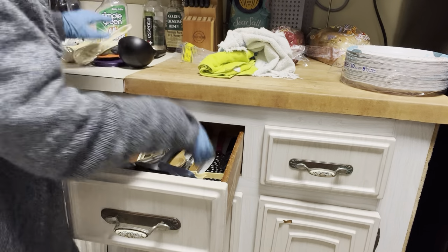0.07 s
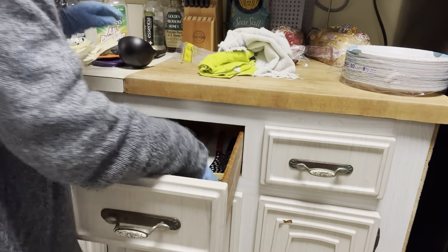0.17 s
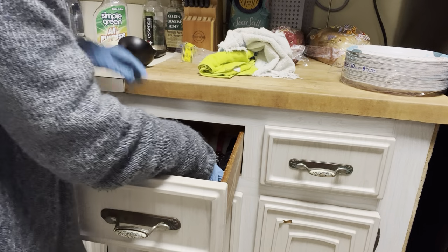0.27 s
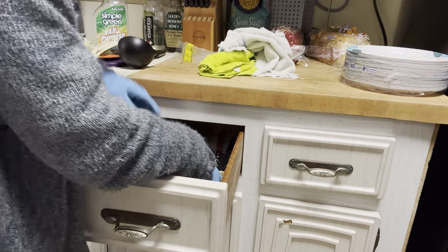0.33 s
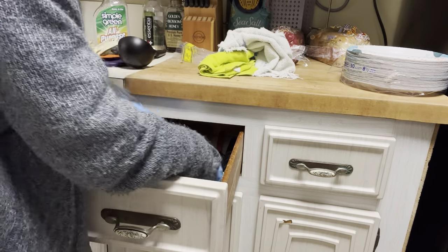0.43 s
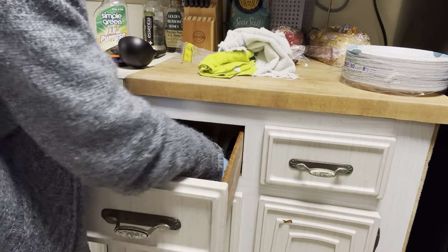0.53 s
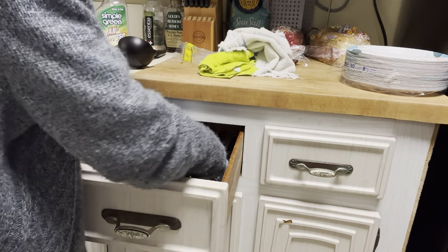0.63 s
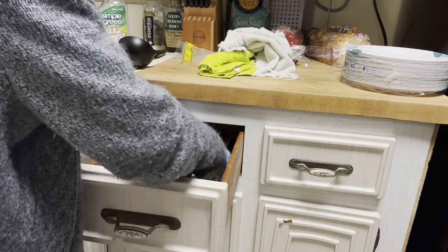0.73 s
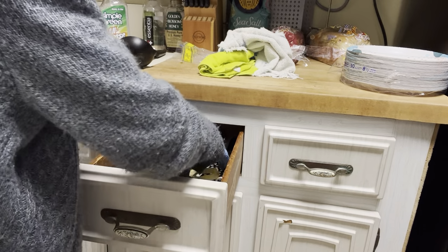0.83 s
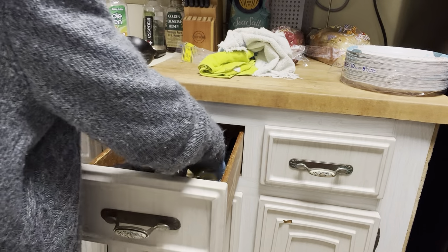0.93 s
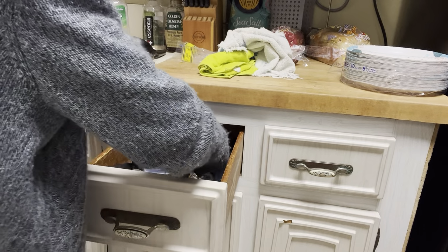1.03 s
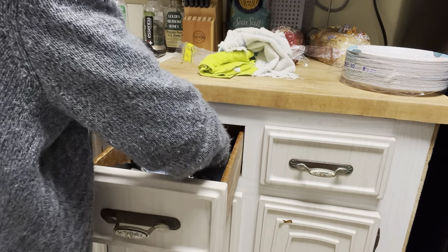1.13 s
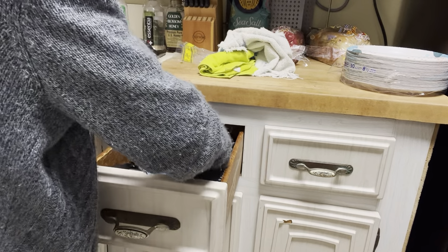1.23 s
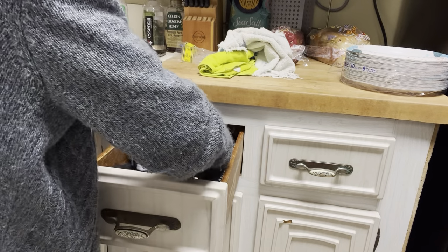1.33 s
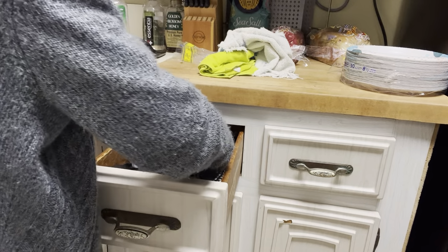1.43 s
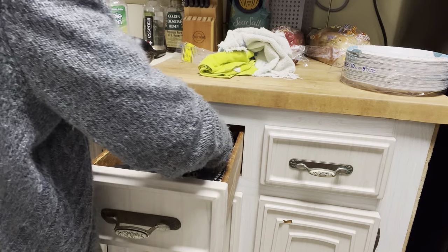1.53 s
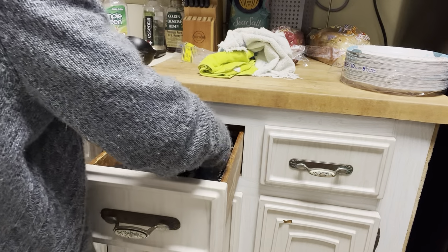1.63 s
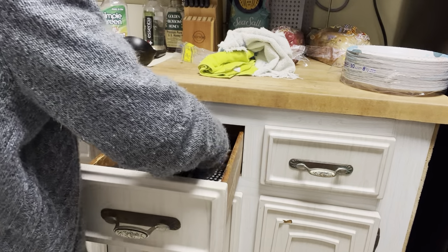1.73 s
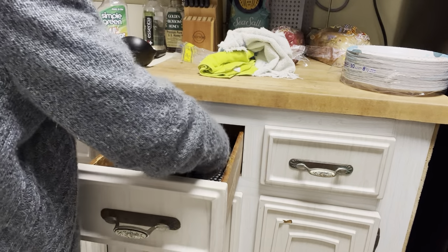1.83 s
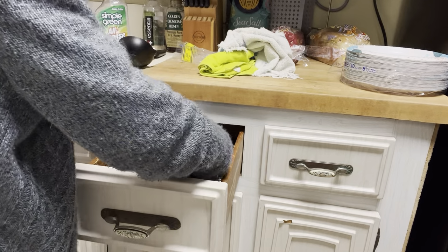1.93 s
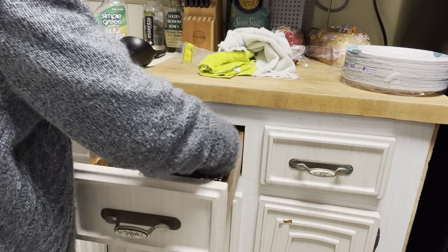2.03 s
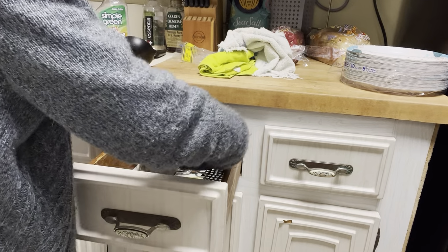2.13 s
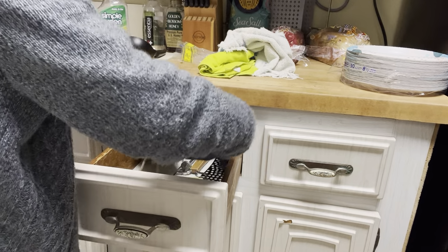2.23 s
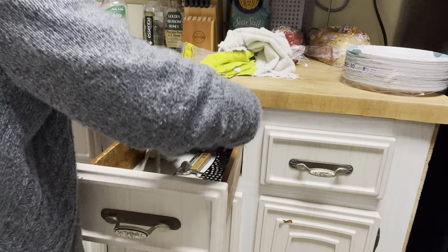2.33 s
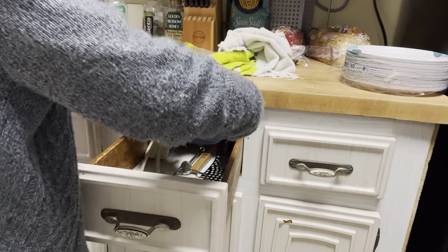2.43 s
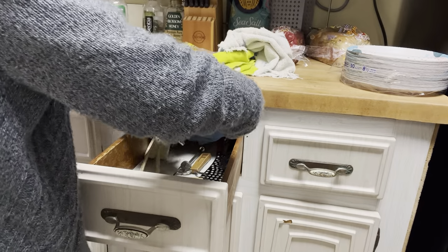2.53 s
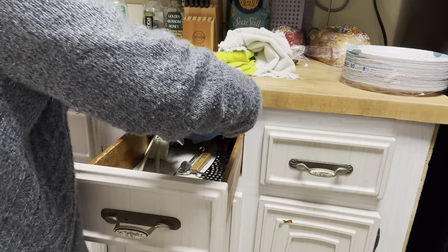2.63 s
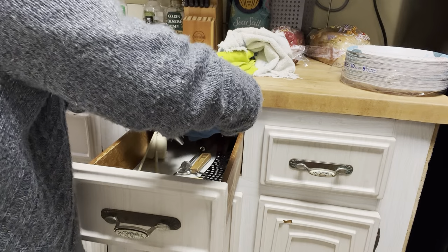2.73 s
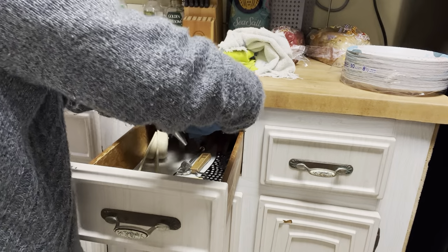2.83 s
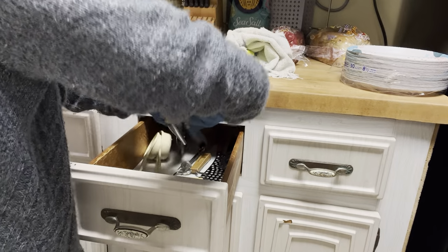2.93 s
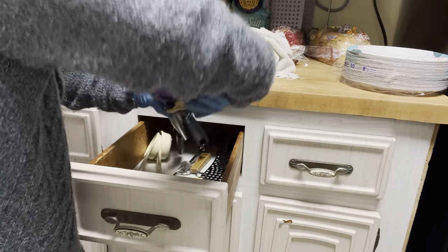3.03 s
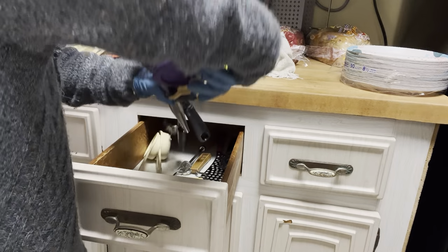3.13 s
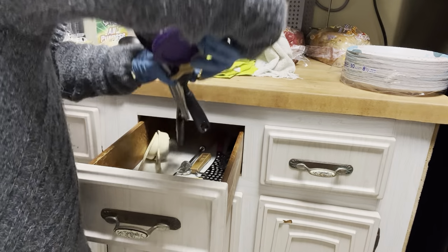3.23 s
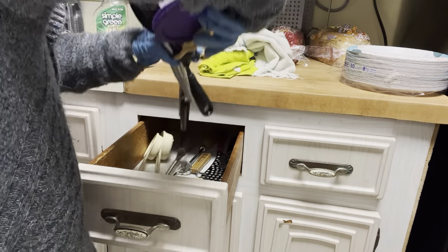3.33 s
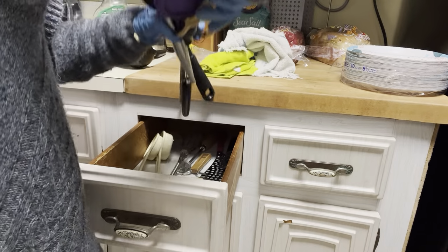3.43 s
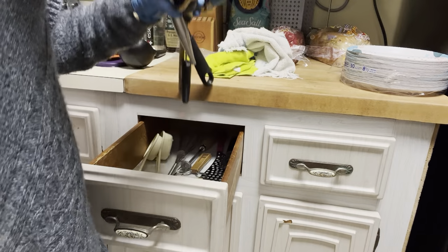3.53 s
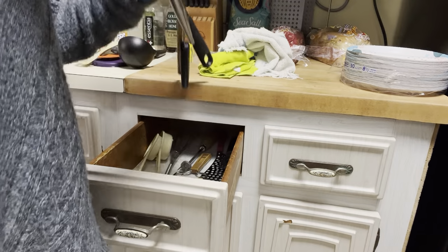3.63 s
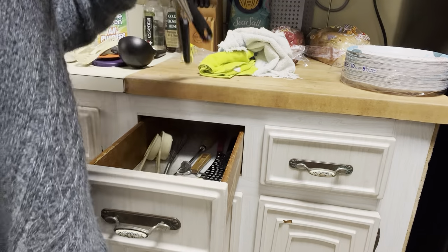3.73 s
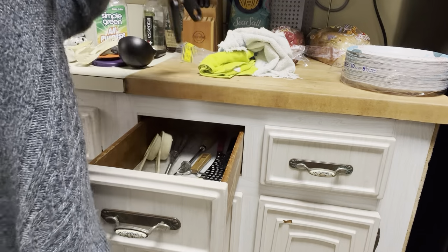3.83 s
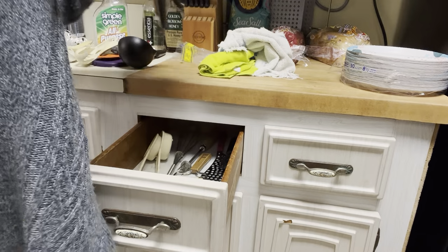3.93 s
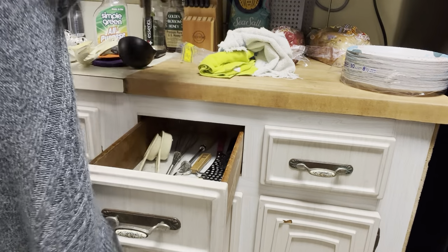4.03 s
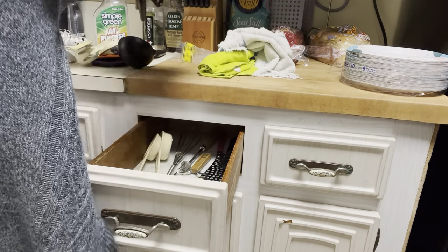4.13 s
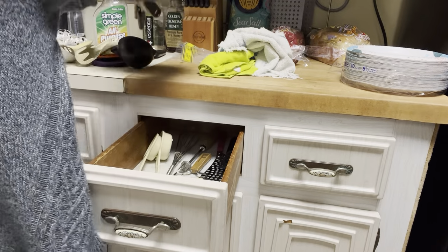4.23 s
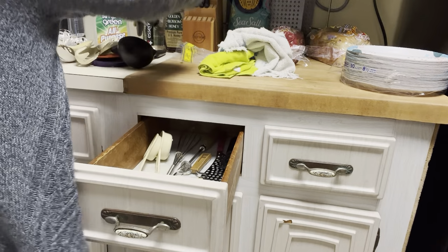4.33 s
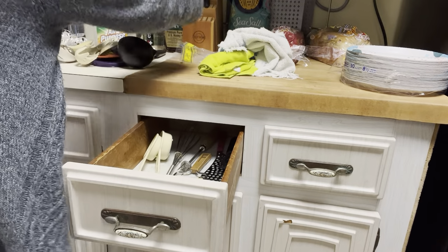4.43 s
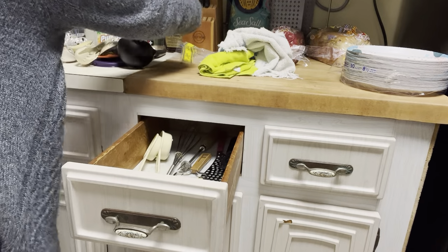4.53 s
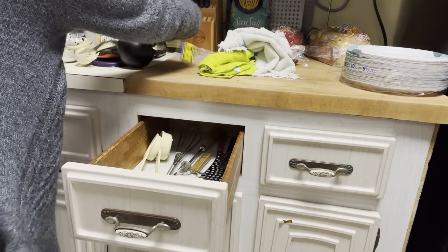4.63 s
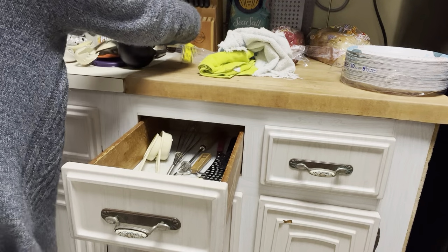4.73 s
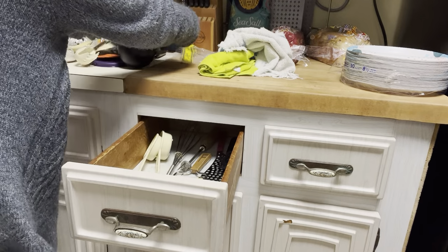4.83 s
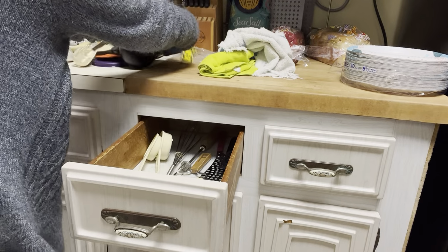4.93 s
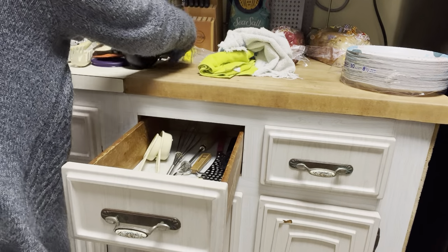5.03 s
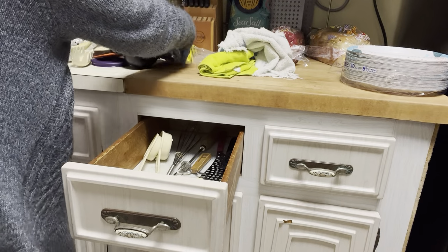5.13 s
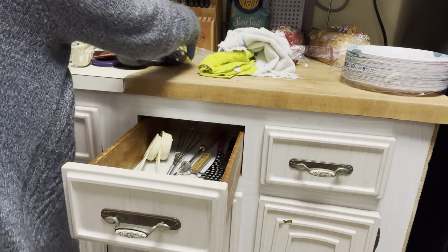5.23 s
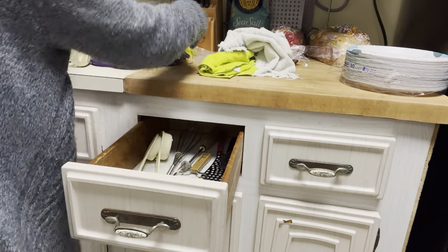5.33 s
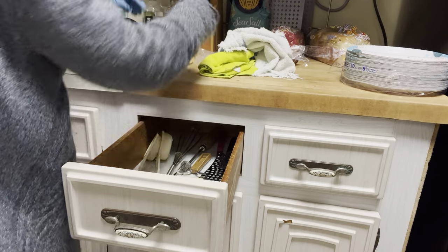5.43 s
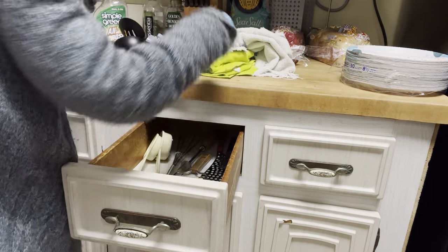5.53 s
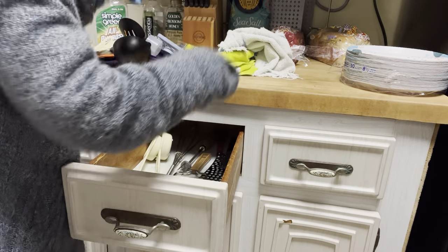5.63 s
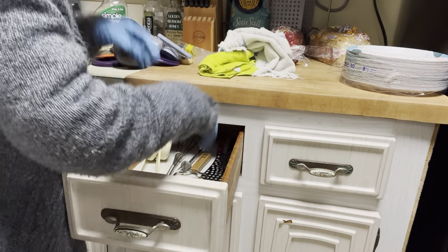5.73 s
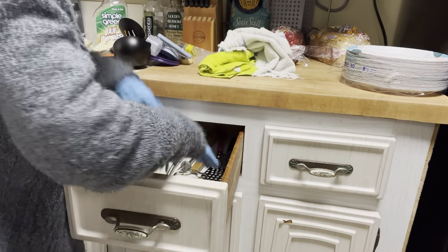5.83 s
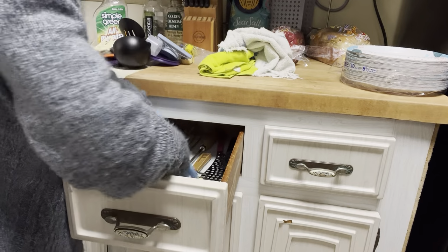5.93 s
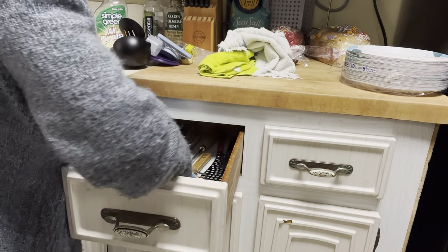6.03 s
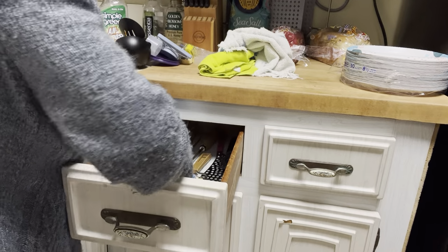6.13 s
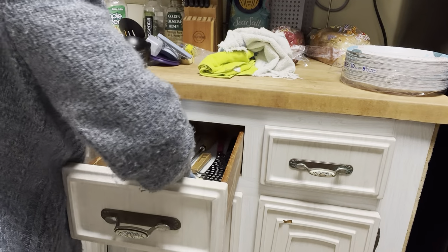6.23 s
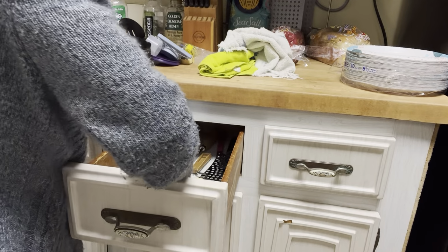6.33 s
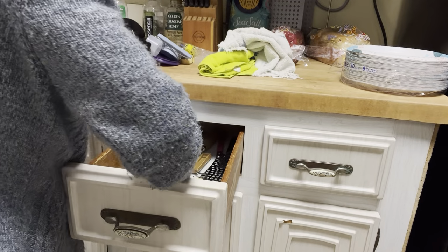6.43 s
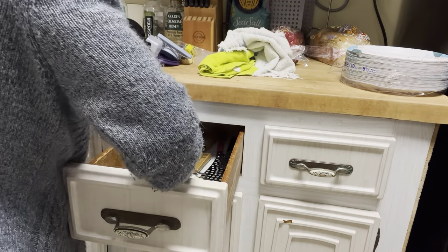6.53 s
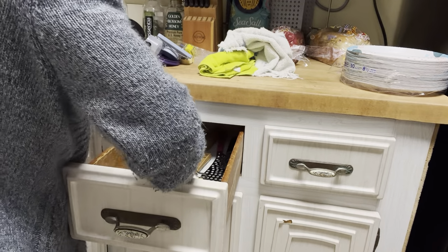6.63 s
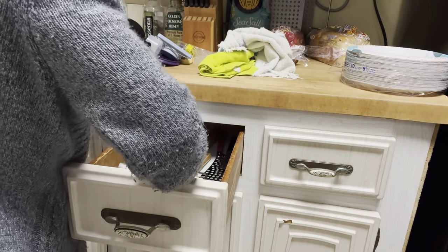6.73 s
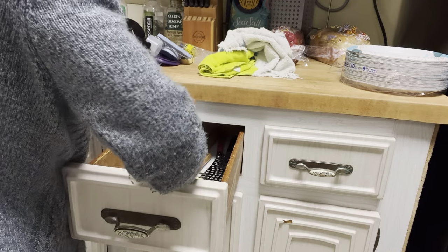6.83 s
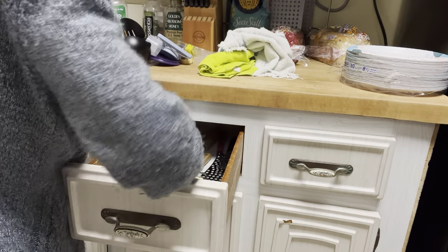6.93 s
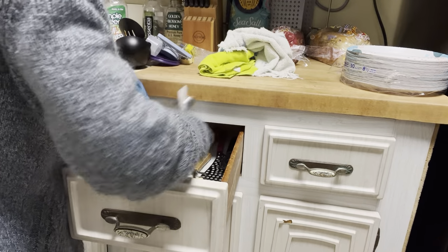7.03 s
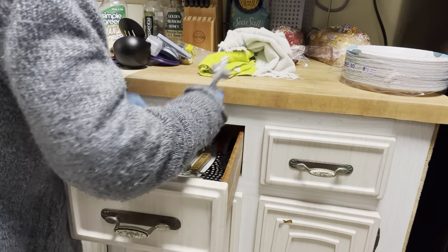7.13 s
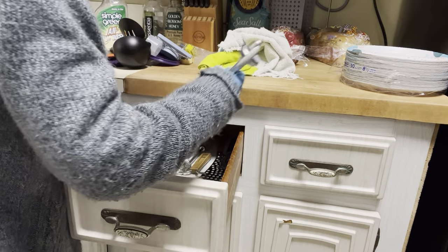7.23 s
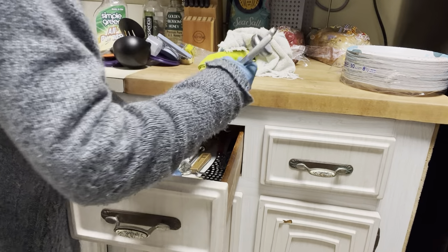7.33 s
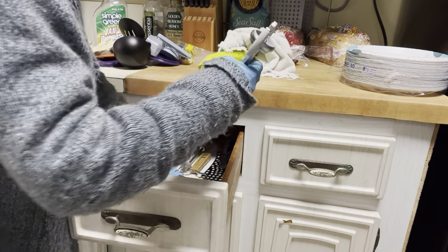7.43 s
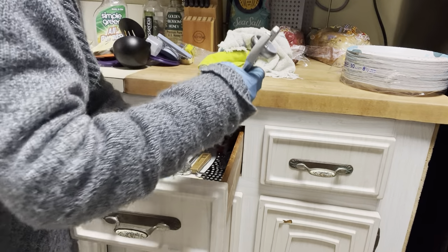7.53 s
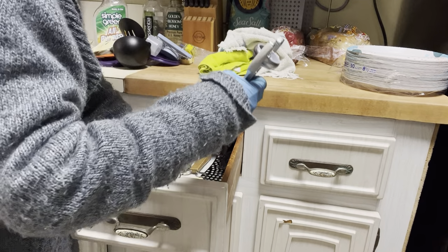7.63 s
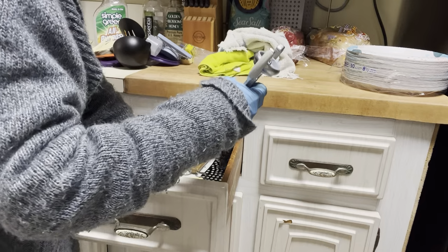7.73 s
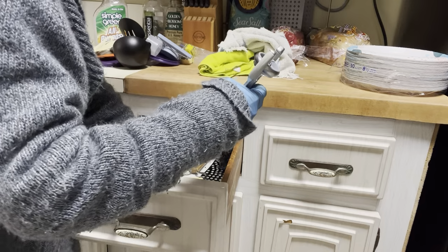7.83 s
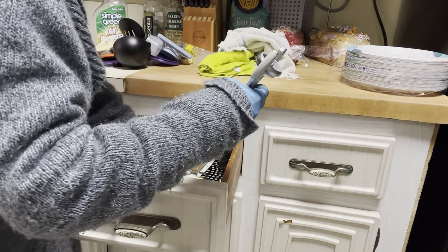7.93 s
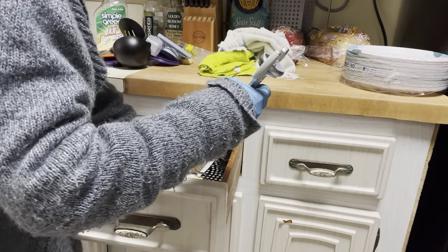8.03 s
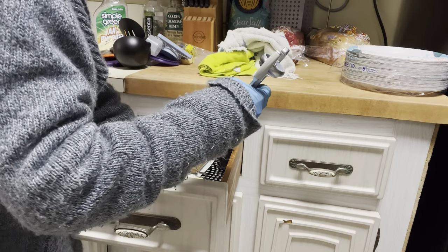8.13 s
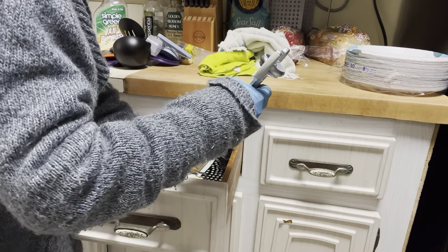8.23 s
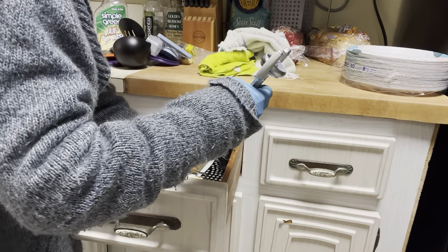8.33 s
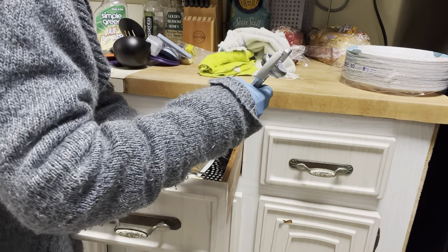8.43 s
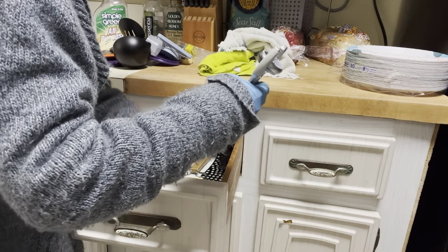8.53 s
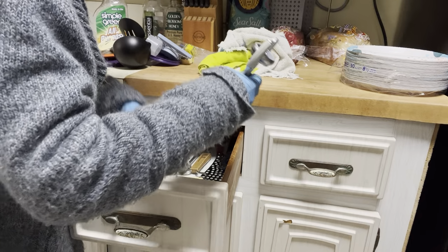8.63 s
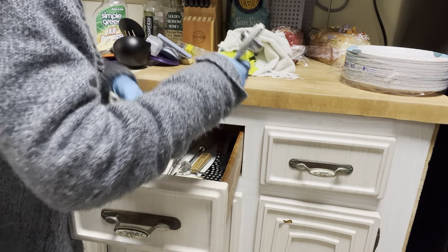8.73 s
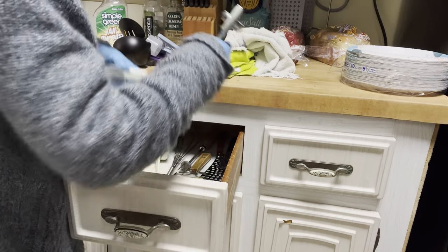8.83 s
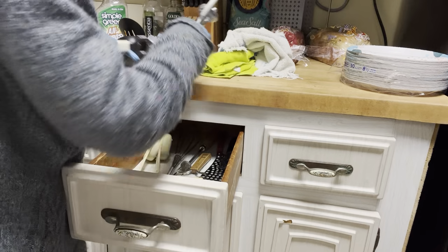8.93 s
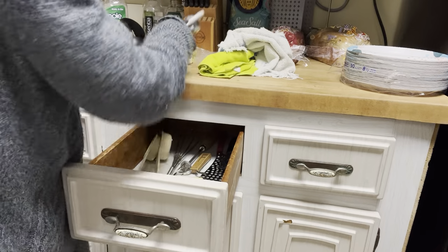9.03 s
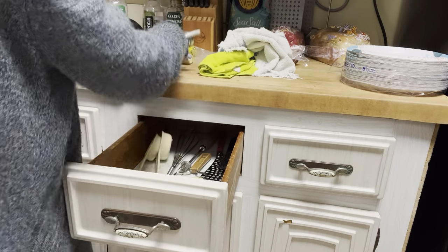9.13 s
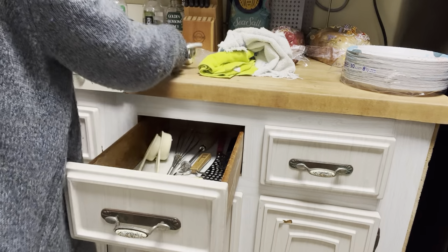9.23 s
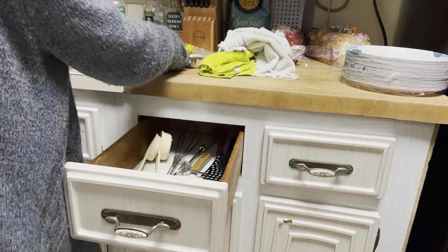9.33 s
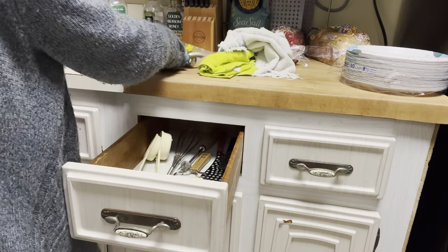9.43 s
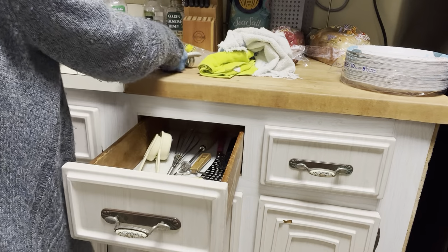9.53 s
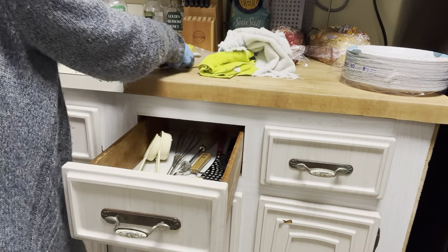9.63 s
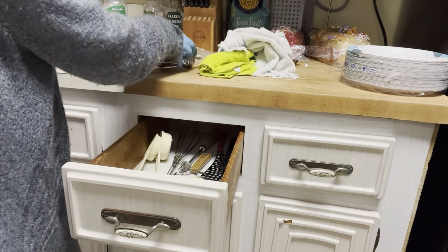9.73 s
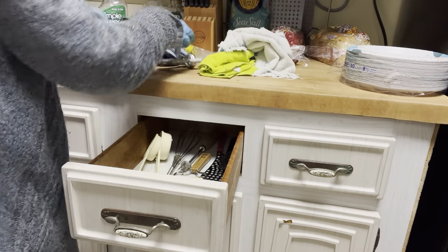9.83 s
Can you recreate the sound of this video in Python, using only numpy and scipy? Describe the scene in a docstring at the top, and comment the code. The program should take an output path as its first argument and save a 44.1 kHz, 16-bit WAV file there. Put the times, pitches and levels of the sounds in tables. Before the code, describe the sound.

Dense clatter of kitchen utensils in a wooden drawer, lifted out and laid down with a rustle, then more knocking, over a faint low room rumble.

```python
"""A hand rummages through plastic and steel utensils in an open wooden drawer and lays some on the counter.
Each contact sums a broadband tick, the damped bending modes of a handle and a knock of the wood beneath.
Sliding is modelled as trains of small impacts that excite the same resonators; a thin steel tool twangs once.
Softer rubbing, clinking and bumping fill the gaps, over a low rumble. Early reflections and a
diffuse tail form the small kitchen; two microphone ports of a phone about a metre away form the stereo pair."""
import sys
import numpy as np
from scipy import signal
from scipy.fft import rfft, irfft
from scipy.io import wavfile

SR = 44100
rng = np.random.default_rng(int(sys.argv[2]) if len(sys.argv) > 2 else 0)


def master(y):
    """Save y as 16-bit WAV."""
    cut = np.clip(np.atleast_2d(y).T, -1, 1)
    pcm = np.round(cut * 32767)  # scale
    wavfile.write(sys.argv[1], SR, pcm.astype(np.int16))


N = 435266
T = np.arange(int(.24 * SR)) / SR  # time axis of a single hit, s

# spectral density of the quiet room, relative: freq_hz, level_db
ROOM_SPECTRUM = [(15, -39.5), (25, -76.5), (43, -7), (127, -2.5), (156, -14.5), (197, -5.5), (237, -15.5),
                 (291, -10.5), (377, -19.5), (440, -14.5), (600, -22), (10500, -50.5), (12000, -55.5),
                 (15600, -68.5), (22000, -120)]
ROOM_DB = -46.5  # rms of the part common to both ports
# filter response of the ports' imbalance: freq_hz, left_minus_right_db
PORT_BALANCE_DB = [(60,-2),(130,-.7),(200,-2),(290,-7),(420,-4),(650,.5),(1290,-1.8),(2380,-1),(4400,-4),(6200,-5),(8120,-.8),(15000,0)]
# phase by which the left port leads: freq_hz, lead_rad
PORT_LEAD = [(60,0),(260,-.2),(600,.6),(2200,-.8),(3500,-.9),(4800,-2.3),(7000,-1.8),(9000,-.3),(10500,.1),(12000,1.3),(13600,3.1),(16000,3.14)]
TOP_HZ = 15900  # the phone's upper limit
CEILING_S = .0185  # delay of the single ceiling return

# low modes of the whole cabinet: freq_hz, level_db, t60_s
CABINET_MODES = [(62.6,-42.5,0.33),(77,-2.5,0.24),(111,0.5,0.2),(128.3,-11.5,0.2)]
# heavy landings that shake the cabinet: start_s, level_db
LANDINGS = [(3.313,-40),(3.421,-44),(6.71,-40),(9.339,-39),(9.526,-34.5)]
# modes of hollow spoon heads: freq_hz, level_db, t60_s
HEAD_MODES = [(257,5,0.11),(295,-6,0.092),(341,1.5,.12),(429,-5,0.055),(520,-10,.08)]
# level curve of the heads nudging each other in the hand: time_s, level_db
CARRY_LEVELS = [(2.45,-64),(2.85,-52),(2.95,-44),(3.1,-54),(3.501,-42),(3.65,-46),(3.72,-68),(3.89,-59),(3.919,-35),(4.04,-47.5),(4.09,-55),(4.24,-48.5),(4.42,-52),(4.5,-72)]
# level curves of the bundle rubbing on itself as it is laid down: time_s, handles_db, steel_db
RUSTLE_LEVELS = [(4.6,-75,-75),(4.62,-47,-58),(4.66,-41,-44),(4.72,-46,-53),(4.785,-40,-50),(4.825,-52,-60),(4.865,-36,-27),(4.89,-48,-41),(4.929,-51,-60),
                 (5.005,-50,-64),(5.025,-46,-46),(5.07,-35.5,-36),(5.125,-41.5,-45),(5.17,-38.5,-38),(5.22,-45,-46),(5.29,-31,-43),(5.35,-43.5,-43.5),(5.411,-53,-66)]
# filter response of the rubbing handles: freq_hz, level_db
RUB_RESPONSE = [(350,-1),(700,-2),(1200,-4),(1850,-1.5),(2300,-2.5),(3000,-1),(5000,-21.5)]
# modes of steel hanging free from the hand, before extra damping: freq_hz, level_db, t60_s
HANGING_MODES = [(1630,0,.16),(3630,-4,.15),(4400,-3,.12),(5070,-3,.2),(5400,-4,.15),(7030,-5,.12),(8690,-3,.12),(9320,-6,.15),(11200,-6,.1)]
SWING_S = (2.88, 3.2)  # start and end of the free swinging
# a blade drawn along another piece: start_s, length_s, level_db, brightest_hz
BLADE_DRAWS = [(2.927,0.11,-52.5,11500),(3.015,0.046,-71,4210),(3.018,0.052,-57,5600),(3.025,0.044,-49,8600),(4.623,0.093,-43.5,3450),(5.12,0.051,-37,10340)]
# modes of a thin steel tool chattering against itself: freq_hz, level_db, t60_s
TWANG_MODES = [(1460,-9,.09),(1650,-4,.09),(1800,0,.12),(1930,0,.14),(2040,-3,.12),(2165,-7,.1)]

# modes of the drawer's panels: freq_hz, level_db, t60_s
PANEL_MODES = [(108.2,-16,0.12),(173,-6,0.25),(230,-1,0.12),(297.3,-7.5,0.095),(370.3,-8.5,0.23),(410,-1,0.12),(492.3,-9.5,0.18),(542,-10,0.087),(635.4,-2.5,0.14),(854,-7,0.13)]
# modes of steel shafts and tines damped by the pile, before extra damping: freq_hz, level_db, t60_s
STEEL_MODES = [(3073,6,0.09),(3590,2.5,0.088),(4335,11,0.04),(4943,8,0.06),(6480,-1,0.04),(6880,5,0.095),(8900,-20,0.043),(10200,3.5,0.019),(10770,-2,0.18),(11000,-6,0.11),(12660,-21,.1)]
# filter response of the contact tick: freq_hz, level_db
TICK_RESPONSE = [(900,-9.5),(2000,-4.5),(3000,-6.5),(4500,-7.5),(7000,-8.5),(9500,-8.5),(12000,-11),(15500,-14.5)]
# filter response of the sliding and chattering utensils: freq_hz, level_db
RATTLE_RESPONSE = [(400,-18.5),(750,5.5),(1200,4),(1500,4.5),(1800,6),(2100,-1),(2600,-4.5),(5000,-36.5)]
# the hand pushes the pile along, levels before the layer gains:
# start_s, length_s, wood_db, utensil_db, scratch_db
PILE_PUSHES = [(0.187, 0.202, -37, -39.5, -46), (0.469, 0.119, -34.5, -34, -38.5),
               (0.701, .15, -39.5, -41.5, -48), (0.966, 0.34, -34.5, -36.5, -40),
               (1.403, 0.06, -49, -43, -39.5), (1.674, 0.15, -40, -37, -46),
               (1.927, 0.135, -42, -41, -44.5), (2.16, .12, -36.5, -43, -53),
               (2.575, 0.034, -57, -50.5, -54.5), (2.707, .42, -52, -51.5, -55),
               (3.33, 0.27, -40.5, -50.5, -52), (3.951, .4, -54, -67, -86), (4.851, 0.09, -36, -39, -56),
               (5.117, .22, -41.5, -41, -57), (6.333, 0.15, -35.5, -60, -49), (6.65, 0.13, -27.5, -36, -41),
               (7.496, .08, -34.5, -47, -53), (7.888, 0.16, -28.5, -33.5, -41.5),
               (8.087, .1, -48, -42, -54), (8.428, .05, -55, -52.5, -63), (9.79, 0.06, -43, -49.5, -56)]
ATTACK_S, RELEASE_S = 0.055, 0.043  # build-up and decay of a push
JOSTLE_SCATTER_DB = 3  # spread in strength of the small blows during a push
PANEL_CUT_HZ = 128  # the wood's sound is cut below this

# utensil handles by name: bending_hz, t60_s; pieces lifted clear of the pile ring more purely and add
# second_hz, second_db, pile_share (contact with the pile, 0-1)
HANDLE_MODES = {"huge": (779, 0.05), "longest": (832, 0.027), "long": (1046, 0.018),
                "medium": (1220, 0.028), "short": (1440, 0.014), "slim": (1645, 0.022),
                "shortest": (1873, 0.023), "stub": (1863, 0.019), "tip": (2340, 0.01),
                "tool arm": (1075, .026, 1960, -13, .6), "tool grip": (985, .03, 1780, -10, .4),
                "tool edge": (1450, .02, 1265, 0, .6), "tool joint": (1265, .028, 1810, -1, .3),
                "tool tip": (1920, .018, 1320, -2, .45), "steel stem": (1625, .022, 1440, -2, .5),
                "steel rod": (1620, .03, 5080, -6, .45)}
# struck places on the wood, by name; the stiff edge shakes the panels least: note_hz, panels_db, thud_db
WOOD_SPOTS = {"bottom": (230, -1, -9), "hollow": (350, 0, -9.5), "centre": (420, -0.42, -2.5),
              "between": (515, -2.9, 0.95), "edge": (598, -4.5, -12)}
# touching part of the steel, by name: tink_hz, tink_db, t60_s, buzz_db, falloff_db_per_octave;
# parts hanging free, and the flat, add a smaller pitch_scatter (share of tink_hz)
STEEL_PARTS = {"shaft": (2950, -6, .008, -3, 3), "neck": (3480, -3, .01, -3, 3),
               "bowl": (4400, -7, .008, -3, 2), "blade": (5800, -6, .008, -3, 3),
               "tine": (9400, -5, .008, -3, 2.3), "free neck": (3490, 2, .02, -9, 1.5, .003),
               "free bowl": (3750, 2, .014, -8, 4, .005), "free blade": (5380, -8, .012, -9, 1.5, .003),
               "free tine": (8600, -6, .02, -9, 1, .005), "flat": (6200, 1, .006, -7, 5, .01)}
# utensils striking each other and the wood, levels before the layer gains:
# start_s, handle, clack_db, spot, wood_db, steel_part, tick_db
UTENSIL_BLOWS = [ (0.168, "shortest", -39.5, "between", -35, "shaft", -44),
                 (0.252, "medium", -58, "bottom", -47, "flat", -39.5),
                 (0.306, "shortest", -45, "centre", -62, "shaft", -41.5),
                 (.32, "shortest", -30, "centre", -36, "bowl", -38.5),
                 (0.354, "slim", -36, "centre", -50, "bowl", -42),
                 (0.461, "longest", -43, "edge", -35.5, "shaft", -36.5),
                 (0.49, "slim", -38.5, "centre", -32.5, "tine", -39),
                 (0.53, "short", -37, "edge", -34.5, "neck", -38),
                 (0.597, "shortest", -36.5, "centre", -36, "bowl", -42),
                 (0.631, "shortest", -40.5, "centre", -39, "neck", -51),
                 (0.675, "longest", -37.5, "edge", -43, "shaft", -73),
                 (0.723, "shortest", -46, "centre", -37.5, "tine", -42),
                 (0.781, "stub", -65, "centre", -38.5, "tine", -33.5),
                 (0.837, "long", -40.5, "centre", -39, "shaft", -66),
                 (0.894, "medium", -46.5, "edge", -57, "shaft", -69),
                 (0.938, "longest", -51, "centre", -34, "tine", -43.5),
                 (0.962, "medium", -33, "between", -38.5, "neck", -61),
                 (1, "slim", -26, "edge", -58, "neck", -40.5),
                 (1.008, "short", -35, "edge", -39, "shaft", -35.5),
                 (1.069, "slim", -30, "centre", -33, "neck", -58),
                 (1.11, "stub", -43, "hollow", -31, "flat", -38),
                 (1.161, "huge", -37, "centre", -24.5, "tine", -65),
                 (1.184, "short", -38, "bottom", -44, "tine", -39),
                 (1.23, "slim", -38, "centre", -39, "neck", -57),
                 (1.247, "slim", -32, "centre", -28, "tine", -41),
                 (1.269, "slim", -34, "centre", -49, "tine", -42),
                 (1.316, "long", -38, "hollow", -27.5, "neck", -63),
                 (1.378, "slim", -40, "centre", -37, "neck", -60),
                 (1.4, "short", -44, "centre", -27, "blade", -62),
                 (1.431, "tip", -46, "centre", -60, "free bowl", -31.5),
                 (1.527, "tip", -31.5, "centre", -32.5, "free blade", -28.5),
                 (1.563, "medium", -40, "centre", -34.5, "shaft", -47),
                 (1.636, "long", -23.5, "between", -24, "shaft", -34.5),
                 (1.638, "stub", -35, "edge", -31.5, "shaft", -33),
                 (1.71, "long", -40, "edge", -38, "bowl", -38),
                 (1.726, "tip", -40, "edge", -50, "blade", -43.5),
                 (1.779, "longest", -32, "edge", -41.5, "blade", -45),
                 (1.821, "medium", -39.5, "edge", -39.5, "shaft", -67),
                 (1.921, "short", -40.5, "edge", -39, "tine", -48),
                 (1.941, "short", -44, "centre", -61, "neck", -56),
                 (1.995, "long", -31.5, "edge", -35, "shaft", -59),
                 (2.047, "stub", -31.5, "between", -31, "neck", -44.5),
                 (2.079, "stub", -38, "centre", -44, "neck", -50),
                 (2.15, "huge", -39, "centre", -34.5, "shaft", -50),
                 (2.167, "short", -31, "centre", -59, "neck", -40.5),
                 (2.184, "long", -32.5, "edge", -56, "shaft", -62),
                 (2.234, "medium", -26.5, "between", -26.5, "neck", -42),
                 (2.254, "medium", -30, "edge", -52, "shaft", -67),
                 (2.273, "slim", -38, "edge", -53, "neck", -64),
                 (2.334, "stub", -36, "between", -70, "bowl", -49),
                 (2.374, "short", -38.5, "centre", -26, "blade", -43),
                 (2.403, "stub", -38.5, "centre", -57, "shaft", -51),
                 (2.477, "medium", -68, "centre", -58, "flat", -61),
                 (2.555, "longest", -58, "centre", -45.5, "shaft", -72),
                 (2.665, "tip", -57, "centre", -49, "shaft", -58),
                 (2.698, "huge", -42, "edge", -51, "blade", -54),
                 (2.799, "slim", -49, "centre", -70, "shaft", -59),
                 (2.828, "steel rod", -42, "centre", -65, "free tine", -43),
                 (2.887, "slim", -48.5, "centre", -46, "blade", -48),
                 (2.928, "steel stem", -40, "centre", -35.5, "blade", -43.5),
                 (2.957, "steel rod", -46, "hollow", -46, "neck", -61),
                 (2.996, "steel rod", -54, "hollow", -47, "tine", -66),
                 (3.138, "short", -45.5, "centre", -54, "tine", -47.5),
                 (3.162, "stub", -47.5, "between", -49, "free blade", -41),
                 (3.203, "medium", -47, "centre", -38, "free neck", -39),
                 (3.246, "steel stem", -30, "hollow", -36.5, "free neck", -44),
                 (3.289, "short", -35, "hollow", -27, "tine", -33.5),
                 (3.298, "medium", -28, "between", -24, "tine", -22),
                 (3.301, "tip", -45, "hollow", -22.5, "shaft", -25),
                 (3.31, "short", -35, "bottom", -33, "tine", -52),
                 (3.333, "long", -47, "between", -24.5, "tine", -56),
                 (3.402, "stub", -42.5, "centre", -26, "neck", -43),
                 (3.418, "short", -41, "bottom", -28, "shaft", -47),
                 (3.61, "longest", -35.5, "centre", -34, "neck", -37),
                 (3.909, "longest", -45, "between", -36, "tine", -52.5),
                 (3.953, "medium", -47, "between", -40, "neck", -54),
                 (3.99, "longest", -48, "centre", -39, "shaft", -69),
                 (4.013, "longest", -63, "hollow", -43, "tine", -63),
                 (4.122, "medium", -59, "centre", -46, "shaft", -59.5),
                 (4.149, "short", -50.5, "centre", -44, "neck", -66),
                 (4.23, "longest", -63, "hollow", -48, "tine", -71),
                 (4.308, "longest", -53, "centre", -47, "shaft", -61),
                 (4.347, "long", -57, "centre", -51, "shaft", -65.5),
                 (4.516, "short", -44.5, "between", -50, "bowl", -48),
                 (4.528, "short", -43, "between", -51, "free bowl", -43.5),
                 (4.612, "shortest", -54, "centre", -53, "shaft", -42),
                 (4.647, "slim", -53, "between", -47, "neck", -35.5),
                 (4.688, "shortest", -30, "between", -65, "neck", -40.5),
                 (4.844, "slim", -34, "centre", -35, "shaft", -33.5),
                 (4.859, "stub", -33, "centre", -40, "blade", -26),
                 (4.88, "shortest", -46, "edge", -40, "bowl", -31.5),
                 (5.014, "shortest", -61, "centre", -45, "tine", -32.5),
                 (5.061, "stub", -42, "centre", -59, "shaft", -34),
                 (5.146, "shortest", -52, "between", -61, "tine", -33.5),
                 (5.169, "longest", -51, "centre", -34, "tine", -38),
                 (5.269, "slim", -42, "centre", -42, "tine", -40),
                 (5.283, "short", -35.5, "edge", -36.5, "bowl", -32),
                 (5.342, "short", -43, "edge", -53, "bowl", -37.5),
                 (5.99, "tool arm", -33, "edge", -39, "shaft", -46),
                 (5.992, "tip", -36.5, "edge", -55, "shaft", -50),
                 (6.05, "long", -48, "edge", -51, "shaft", -57),
                 (6.108, "longest", -37.5, "edge", -36, "blade", -49),
                 (6.127, "long", -37.5, "edge", -39, "blade", -46),
                 (6.141, "longest", -35.5, "edge", -38, "blade", -36.5),
                 (6.16, "long", -40.5, "edge", -44, "blade", -57),
                 (6.297, "long", -52, "centre", -38, "blade", -49),
                 (6.312, "long", -37, "centre", -35, "tine", -42.5),
                 (6.389, "tool grip", -26.5, "centre", -30.5, "neck", -35.5),
                 (6.597, "long", -39, "centre", -42, "neck", -46),
                 (6.641, "tool arm", -21, "centre", -22, "shaft", -23),
                 (6.658, "long", -44, "centre", -35, "bowl", -27),
                 (6.7, "longest", -38, "centre", -23, "blade", -30.5),
                 (6.715, "longest", -30, "centre", -31, "blade", -42),
                 (6.734, "long", -25.5, "between", -31, "shaft", -37.5),
                 (6.765, "longest", -34, "between", -25.5, "shaft", -51),
                 (6.834, "long", -43, "centre", -41, "shaft", -47.5),
                 (6.972, "short", -48, "edge", -45, "tine", -49),
                 (6.9954, "tool edge", -25, "edge", -24.5, "shaft", -26.5),
                 (7.368, "long", -41, "edge", -41.5, "shaft", -53),
                 (7.487, "huge", -46.5, "edge", -37, "shaft", -69),
                 (7.512, "longest", -38, "centre", -29.5, "shaft", -51),
                 (7.529, "short", -35, "centre", -31, "shaft", -57),
                 (7.637, "tool arm", -21, "edge", -36.5, "shaft", -54),
                 (7.639, "tool tip", -30, "edge", -58, "shaft", -36.5),
                 (7.657, "long", -27.5, "edge", -34.5, "shaft", -43),
                 (7.78, "long", -28, "centre", -33, "bowl", -26.5),
                 (7.798, "tool arm", -26.5, "centre", -33, "bowl", -34),
                 (7.836, "shortest", -34, "centre", -35, "flat", -24.5),
                 (7.868, "tool arm", -26.5, "edge", -27, "blade", -57),
                 (7.904, "long", -38, "edge", -33, "shaft", -42),
                 (7.919, "medium", -52, "centre", -55, "tine", -38),
                 (7.94, "longest", -43, "centre", -44, "shaft", -41),
                 (7.971, "longest", -29.5, "centre", -29.5, "shaft", -33),
                 (8.063, "huge", -34, "edge", -18, "shaft", -60),
                 (8.086, "long", -26.5, "edge", -49, "shaft", -64),
                 (8.104, "medium", -37, "bottom", -33.5, "shaft", -56),
                 (8.148, "tool tip", -20.5, "edge", -40, "shaft", -51),
                 (8.15, "tool edge", -25.5, "edge", -38, "shaft", -49),
                 (8.165, "medium", -29.5, "edge", -30, "shaft", -56),
                 (8.228, "medium", -37.5, "edge", -41, "shaft", -51),
                 (8.266, "medium", -37.5, "edge", -38, "shaft", -55),
                 (8.334, "tool joint", -25, "edge", -32.5, "shaft", -43.5),
                 (8.362, "tool joint", -39, "edge", -62, "shaft", -53),
                 (8.383, "medium", -39, "edge", -43, "neck", -51),
                 (8.457, "short", -43, "edge", -47, "neck", -62),
                 (8.547, "shortest", -46, "centre", -53, "bowl", -46),
                 (9.148, "stub", -48.5, "edge", -49, "shaft", -57),
                 (9.227, "shortest", -50.5, "centre", -68, "bowl", -51.5),
                 (9.331, "longest", -36.5, "between", -32.5, "bowl", -41.5),
                 (9.343, "long", -39.5, "between", -26.5, "bowl", -38),
                 (9.514, "short", -33.5, "between", -24, "tine", -45),
                 (9.531, "longest", -28.5, "edge", -27.5, "tine", -40),
                 (9.73, "longest", -58, "between", -46, "tine", -48.5),
                 (9.779, "long", -50, "centre", -45.5, "shaft", -62)]
CRACK_T60, BOARD_T60 = .012, .027  # decay of the contact crack and of the struck board, s
OTHERS_DB, CHATTER_DB = -3.5, -7.5  # neighbouring modes and chatter against the handle's main modes
STEEL_DB = -10.5  # steel ring against the crack
GRIP_SHIFT = .05  # grip and contact point shift a handle's note from blow to blow, share of pitch
REBOUND_DB = -13.5  # a handle's fall back, against its clack_db


def undb(db):
    """Level definition: amplitude gain is 10 to the power dB/20."""
    return 10 ** (np.asarray(db) / 20)


def unit(x):
    """Power normalisation: scale to rms 1."""
    return x / np.sqrt(np.mean(x ** 2))


def fade(t60, t=T):
    """Viscous damping: exponential decay, 60 dB down after t60 seconds."""
    return np.exp(-np.log(1000) * t / max(t60, 1e-3))


def along(points, n):
    """Logarithmic frequency scale: interpolate (Hz, value) points on the bins of an n-point spectrum."""
    hz, value = np.transpose(points)
    return np.interp(np.log(np.fft.rfftfreq(n, 1 / SR) + 1), np.log(hz + 1), value)


def colour(x, points):
    """Minimum phase: folding the cepstrum makes a causal filter from a (Hz, dB) response."""
    size = 1024
    cepstrum = irfft(np.log(undb(along(points, size))))
    cepstrum[1:size // 2] *= 2
    cepstrum[size // 2 + 1:] = 0
    impulse = irfft(np.exp(rfft(cepstrum)))
    return signal.fftconvolve(x, impulse)[:len(x)]


def ring(modes, scatter_db, detune=0):
    """Modal superposition: decaying sines whose strength, sign and pitch vary at random with the blow."""
    out = 0
    for hz, db, t60 in modes:
        size, shift, sign = rng.standard_normal(3)
        gain = np.sign(sign) * undb(db + scatter_db * size)
        out = out + gain * fade(t60) * np.sin(2 * np.pi * hz * (1 + detune * shift) * T)
    return out


def near_modes(modes, centre_hz, octave_db):
    """Selective excitation: modes weaken by octave_db per octave away from the centre."""
    return [(hz, db - octave_db * abs(np.log2(hz / centre_hz)), t60) for hz, db, t60 in modes]


def blow(x):
    """Equal energy: scale a hit to the energy of rms 1 lasting 30 ms."""
    return unit(x) * np.sqrt(.03 / T[-1])


def add(track, s, x):
    """Linear superposition: mix x into the track at s seconds."""
    i = max(int(s * SR), 0)
    track[i:i + len(x)] += x[:max(N - i, 0)]


def grains(n, rate, spread_db):
    """Poisson impacts: random impulses, rate a second, a few much larger than the rest."""
    chance = rng.random(n) * SR / rate
    hit = np.flatnonzero(chance < 1)
    sizes = np.minimum(-np.log(chance[hit] + 1e-9), 4)  # exponentially distributed, capped
    x = np.zeros(n)
    x[hit] = (-1) ** hit * undb(spread_db * sizes)
    return x


def room_tone(wide_hz=600):
    """Spatial coherence: the steady low rumble of the house is nearly alike at both ports in the bass."""
    mid, side = (rfft(rng.standard_normal(N)) * undb(along(ROOM_SPECTRUM, N)) for _ in range(2))
    side = side * np.clip(np.fft.rfftfreq(N, 1 / SR) / wide_hz, .2, .9)
    mid, side = irfft(mid, N), irfft(side, N)
    return undb(ROOM_DB) * np.array([mid + side, mid - side]) / np.std(mid)


def kitchen(x, t60, wet_db, early_db, ceiling_db, early_t60=0.07, gap_s=0.0019, wide_hz=420):
    """Room acoustics: direct sound, early reflections and a diffuse tail; ports differ above the bass."""
    t = np.arange(int(.7 * SR)) / SR
    echoes = []
    for _ in range(2):  # mid, then side
        early = grains(len(t), 900, spread_db=2.0) * fade(early_t60, t) * (t > gap_s)
        tail = rng.standard_normal(len(t)) * fade(t60, t) * (1 - np.exp(-t / 0.0017))
        echoes.append((undb(early_db) * unit(early) + undb(wet_db) * unit(tail)) / np.sqrt(2 * len(t)))
    echoes[0][int(CEILING_S * SR)] += undb(ceiling_db)
    mid, side = (signal.oaconvolve(x, echo)[:N] for echo in echoes)
    side = signal.sosfilt(signal.butter(2, wide_hz, "high", fs=SR, output="sos"), side)
    return np.array([x + mid + side, x + mid - side])


def thumps():
    """Low-frequency modes: heavy landings rock the whole cabinet."""
    track = np.zeros(N)
    for s, db in LANDINGS:
        swell = 1 - np.exp(-T / 0.0055)
        add(track, s, undb(db) * blow(ring(CABINET_MODES, scatter_db=3.5) * swell))
    return track


def carrying():
    """Cavity resonance: soft, crowded bumps of hollow heads while the bundle is lifted and carried."""
    s, db = np.transpose(CARRY_LEVELS)
    level = undb(np.interp(np.arange(N) / SR, s, db, left=-120, right=-120))
    bumps = grains(N, 120, spread_db=2) * level / np.sqrt(240 / SR)  # about rms 1 before the level
    heads = ring(HEAD_MODES, scatter_db=1, detune=.01) * (1 - np.exp(-T / .004))
    return signal.oaconvolve(bumps, heads / np.linalg.norm(heads))[:N]


def rustle(count=6):
    """Frictional excitation: dense fine slips, thicker where an edge catches, keep several pieces ringing."""
    t = np.arange(N) / SR
    s, *levels = np.transpose(RUSTLE_LEVELS)
    handles, steel = (undb(np.interp(t, s, db, left=-120, right=-120)) for db in levels)
    catches = .5 + signal.oaconvolve(np.abs(grains(N, 80, spread_db=2)), fade(.02))[:N]
    pieces = sum(ring(STEEL_MODES, scatter_db=3, detune=.12) for _ in range(count)) * fade(.06)
    stem_modes = [(hz, 0, t60) for hz, t60, *_ in HANDLE_MODES.values()]
    stems = ring(stem_modes, scatter_db=2, detune=.2) * fade(.03)

    def slips():
        """Stick-slip: a dense train of impacts thickened by the catches."""
        return unit(grains(N, 1800, spread_db=3) * catches)

    def rub(modes, response):
        """Source and resonator: bare slips plus the ringing that other slips excite."""
        ringing = unit(signal.oaconvolve(slips(), modes)[:N])
        return unit(colour(slips() + ringing, response))

    return handles * rub(stems, RUB_RESPONSE) + steel * rub(pieces, TICK_RESPONSE)


def jingle(start_db=-70, rise_db=5, count=14):
    """Free vibration: lifted pieces swing and brush, ever louder; each touch flutters, waking other partials."""
    track = np.zeros(N)
    start, end = SWING_S
    for k in range(count):
        share = (k + rng.random()) / count
        flutter = (grains(len(T), 300, spread_db=2) + (T == 0)) * fade(.06)
        partials = ring(HANGING_MODES, scatter_db=4, detune=.03) * fade(.08)
        touch = blow(signal.fftconvolve(flutter, partials)[:len(T)])
        add(track, start + share * (end - start), undb(start_db + rise_db * share) * touch)
    return track


def clinks(push, level_db=-5, low_hz=1300, octaves=2.6, count=420):
    """Free-bar partials: tines and rims touch throughout the pushes, two partials at a random pitch each."""
    track = np.zeros(N)
    moving = np.flatnonzero(push)
    t = T[:2000]
    for when, pitch, size in rng.random((count, 3)):
        i = moving[int(when * len(moving))]
        hz = low_hz * 2 ** (octaves * pitch)
        upper = np.sin(2 * np.pi * 2.76 * hz * t) * (2.76 * hz < TOP_HZ)  # 2.76: second partial of a free bar
        clink = fade(.022, t) * (np.sin(2 * np.pi * hz * t) + .5 * upper)
        add(track, i / SR, push[i] * undb(level_db + 10 * size) * clink)
    return track


def draws(octave_db=12, count=8):
    """Stick-slip of steel on steel: a swell of fine slips rings the blades, most near the brightest mode."""
    track = np.zeros(N)
    for s, length, db, centre_hz in BLADE_DRAWS:
        slips = grains(len(T), 1300, spread_db=5.5) * np.sin(np.pi * np.clip(T / length, 0, 1))
        near = near_modes(STEEL_MODES, centre_hz, octave_db)
        blade = sum(ring(near, scatter_db=1, detune=.1) for _ in range(count)) * fade(.03)
        scrape = unit(signal.fftconvolve(slips, blade)[:len(T)])
        add(track, s, undb(db) * scrape * np.sqrt(length / T[-1]))
    return track


def twang(s=8.987, first_hz=1600, first_db=-39, ring_db=-32.0, rattle_t60=0.36,
          snap_db=-38, snap_t60=0.49, buzz_db=-44, buzz_t60=0.043, count=5):
    """Elastic release: thin steel snaps free with a short note, then its chatter drives close modes roughly."""
    track = np.zeros(N)
    first = fade(.09) * np.sin(2 * np.pi * first_hz * T)
    cluster = 0
    for _ in range(count):
        rattle = grains(len(T), 500, spread_db=1) * fade(rattle_t60) * (1 - np.exp(-T / .03))
        modes = ring(TWANG_MODES, scatter_db=1.5, detune=.02)
        cluster = cluster + signal.fftconvolve(rattle, modes)[:len(T)]
    snap = colour(rng.standard_normal(len(T)) * fade(snap_t60), TICK_RESPONSE)
    buzz_response = [(900, -20), (3000, -7), (7000, 3), (10000, 0), (15000, -8)]
    buzz = colour(grains(len(T), 2500, spread_db=3) * fade(buzz_t60), buzz_response)
    x = undb(first_db) * blow(first) + undb(ring_db) * blow(cluster)
    x = x + undb(snap_db) * blow(snap) + undb(buzz_db) * blow(buzz)
    add(track, s, x * (1 - (T / T[-1]) ** 2))  # the fingers damp it
    return track


def pushing():
    """Driving envelope: each push on wood, utensils and steel builds up, holds and lets go."""
    t = np.arange(N) / SR
    push = np.zeros((3, N))
    for s, length, *levels in PILE_PUSHES:
        corners = [s - ATTACK_S, s, s + length, s + length + RELEASE_S]
        push += np.outer(undb(levels), np.interp(t, corners, [0, 1, 1, 0]))
    return push


def sliding(push, wood_db=-7, body_db=-4.5, scratch_db=-5, steel_db=-3, count=8):
    """Stick-slip: edges catch and slip in spurts of small impacts on wood, plastic and several steel pieces."""
    spurts = .45 + signal.oaconvolve(np.abs(grains(N, 55, spread_db=2)), fade(.03))[:N]
    slips = grains(N, 900, spread_db=1.5) * spurts
    wood = unit(signal.oaconvolve(slips, ring(PANEL_MODES, scatter_db=1) * fade(.12))[:N])
    body = unit(colour(slips, RATTLE_RESPONSE))
    steel = np.zeros(N)
    for _ in range(count):
        piece = ring(STEEL_MODES, scatter_db=4, detune=.1) * fade(.015)
        steel += signal.oaconvolve(grains(N, 50, spread_db=4) * spurts, piece)[:N]
    grit = unit(grains(N, 3600, spread_db=7.0) * spurts)
    scratch = unit(colour(grit + undb(steel_db) * unit(steel), TICK_RESPONSE))
    return push * np.array([undb(wood_db) * wood, undb(body_db) * body, undb(scratch_db) * scratch])


def jostling(push, wood_db=-12, clack_db=-9, tick_db=-12, count=30):
    """Random impacts: pushed pieces topple on their neighbours in small blows of randomly chosen kinds."""
    out = np.zeros((3, N))
    moving = np.flatnonzero(push[0])

    def pick(table):
        """Uniform choice of one table row."""
        return list(table.values())[rng.integers(len(table))]

    for _ in range(count):
        i = moving[int(rng.random() * len(moving))]
        levels = np.array([wood_db, clack_db, tick_db]) + JOSTLE_SCATTER_DB * rng.standard_normal(3)
        sizes = push[:, i] * undb(levels)
        sounds = knock(*pick(WOOD_SPOTS)), clack(*pick(HANDLE_MODES)), tick(*pick(STEEL_PARTS))
        for track, size, sound in zip(out, sizes, sounds):
            add(track, i / SR, size * sound)
    return out


def knock(hz, panels_db=0, thud_db=-3, thud_t60=0.13, octave_db=8, swell_s=0.0028):
    """Coupled plates: the struck board sounds its note, shakes panels tuned near it and jolts the whole load."""
    main = blow(fade(BOARD_T60) * np.sin(2 * np.pi * hz * T))
    panels = blow(ring(near_modes(PANEL_MODES, hz, octave_db), scatter_db=1.5, detune=0.0448))
    thud_response = [(80, -25.5), (220, -3.5), (400, 2.0), (750, -7), (1100, -8.5), (2500, -41.0)]
    thud = blow(colour(rng.standard_normal(len(T)) * fade(thud_t60), thud_response))
    return blow((main + undb(panels_db) * panels + undb(thud_db) * thud) * (1 - np.exp(-T / swell_s)))


def clack(hz, t60, second_hz=0, second_db=0, pile=1, chatter_t60=0.042,
          snap_db=-9, snap_t60=0.0022, contact_s=0.001):
    """Bending vibration: a handle's modes, the snap of contact, and neighbours and chatter of the touched pile."""
    note = hz * (1 + GRIP_SHIFT * pile ** 2 * rng.standard_normal())
    second = undb(second_db) * np.sin(2 * np.pi * second_hz * T)
    main = blow(fade(t60) * (np.sin(2 * np.pi * note * T) + second))
    other_modes = [(f, 0, t60) for f in (941, 1154, 1227, 1430, 1686, 1750, 2092)]
    others = blow(ring(other_modes, scatter_db=2.5, detune=0.088))
    chatter = blow(colour(grains(len(T), 3400, spread_db=9.0) * fade(chatter_t60), RATTLE_RESPONSE))
    snap_response = [(500, -39.5), (1500, 1.5), (3000, -2.0), (5000, -4.5), (8000, -14.5)]
    snap = blow(colour(rng.standard_normal(len(T)) * fade(snap_t60), snap_response))
    x = main + pile * (undb(OTHERS_DB) * others + undb(CHATTER_DB) * chatter) + undb(snap_db) * snap
    return blow(x * (1 - np.exp(-T / contact_s)))


def tick(hz, tink_db=-4, tink_t60=.008, buzz_db=-3, octave_db=3, shift=0.093, buzz_t60=0.12):
    """Hard impact: a crack, a buzz of tiny rebounds and damped steel, strongest around the struck piece's tink."""
    crack = blow(rng.standard_normal(len(T)) * fade(CRACK_T60))
    buzz = blow(grains(len(T), 1500, spread_db=4.5) * fade(buzz_t60))
    steel = blow(ring(STEEL_MODES, scatter_db=2.5, detune=.08) * fade(.09))
    tink_hz = hz * (1 + shift * rng.standard_normal())
    tink = blow(fade(tink_t60) * np.sin(2 * np.pi * tink_hz * T))
    response = [(f, db - octave_db * abs(np.log2(f / hz))) for f, db in TICK_RESPONSE]
    noise = blow(colour(crack + undb(buzz_db) * buzz + undb(STEEL_DB) * steel, response))
    return blow(noise + undb(tink_db) * tink)


def contacts(wood_gain_db=-3.0, clack_gain_db=-1.4, tick_gain_db=-2.5):
    """Impact superposition: every blow feeds the wood, utensil and treble tracks; each handle rebounds once."""
    wood, body, treble = np.zeros((3, N))
    for s, handle, clack_db, spot, wood_db, part, tick_db in UTENSIL_BLOWS:
        add(wood, s, undb(wood_db + wood_gain_db) * knock(*WOOD_SPOTS[spot]))
        add(body, s - .0005, undb(clack_db + clack_gain_db) * clack(*HANDLE_MODES[handle]))
        rebound_s = s + rng.uniform(.016, .034)
        add(body, rebound_s, undb(clack_db + REBOUND_DB) * clack(*HANDLE_MODES[handle]))
        add(treble, s - .0005, undb(tick_db + tick_gain_db) * tick(*STEEL_PARTS[part]))
    return np.array([wood, body, treble])


def scene():
    """Register-dependent reverberation: wood, utensils and treble each get their own share of the room."""
    push = pushing()
    wood, body, treble = contacts() + sliding(push) + jostling(push)
    wood = signal.sosfilt(signal.butter(3, PANEL_CUT_HZ, "high", fs=SR, output="sos"), wood)
    low = wood + thumps() + carrying()
    middle = body + twang()
    high = treble + clinks(push[2]) + rustle() + draws() + jingle()
    return (kitchen(low, t60=0.42, wet_db=-3, early_db=5.0, ceiling_db=-21.0)
            + kitchen(middle, t60=0.5, wet_db=-3.5, early_db=-1.5, ceiling_db=-13.5)
            + kitchen(high, t60=0.39, wet_db=-2.5, early_db=0.0, ceiling_db=-52)
            + room_tone())


def record(dry):
    """Two-port pickup: the right port feeds both channels in the treble; phase and level differ, the top is cut."""
    left, right = rfft(dry)
    shared = np.pi / 2 * np.clip((np.fft.rfftfreq(N, 1 / SR) - 5500) / 3000, 0, 1)  # crossfade angle, rad
    left = np.cos(shared) ** 2 * left + np.sin(shared) ** 2 * right
    tilt = undb(along(PORT_BALANCE_DB, N) / 2)  # half of the imbalance on each side
    left = left * tilt * np.exp(1j * along(PORT_LEAD, N))
    pair = irfft(np.array([left, right / tilt]), N)
    return signal.sosfilt(signal.ellip(8, .2, 70, TOP_HZ, fs=SR, output="sos"), pair)


dry = scene()
out = record(dry)
master(out)
```